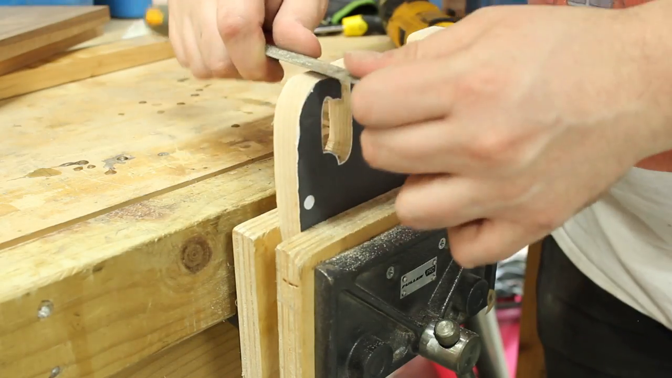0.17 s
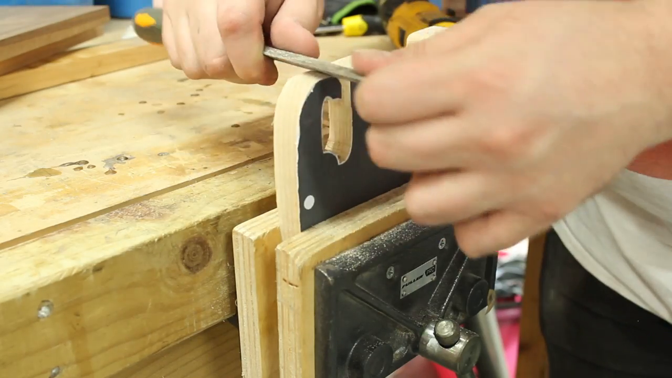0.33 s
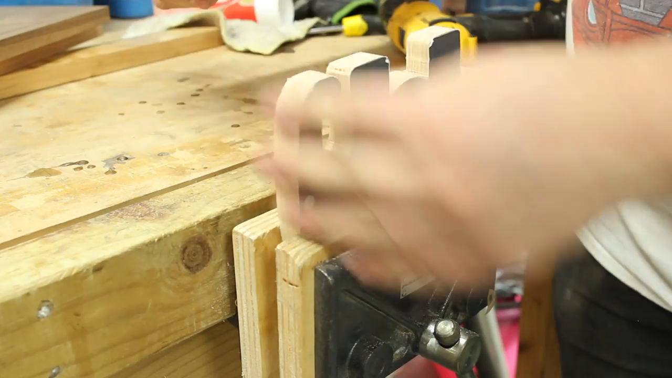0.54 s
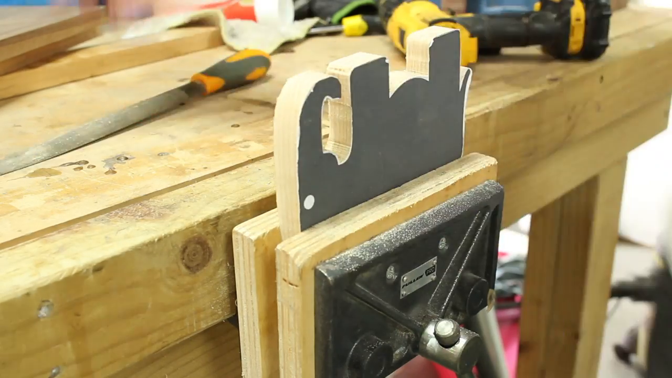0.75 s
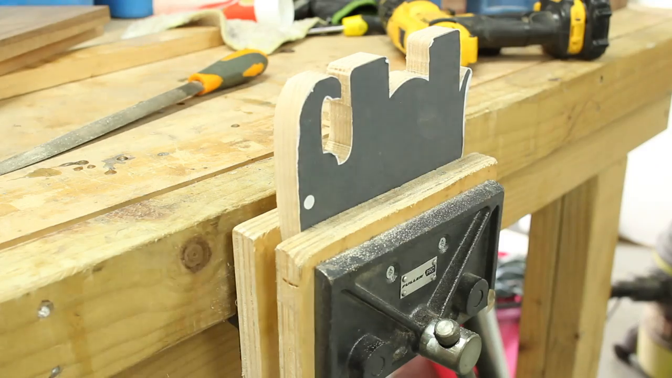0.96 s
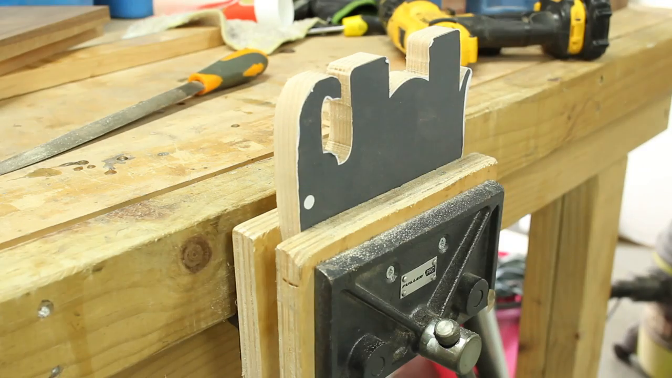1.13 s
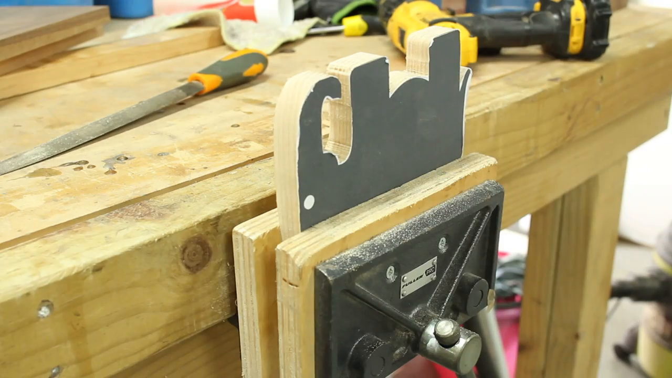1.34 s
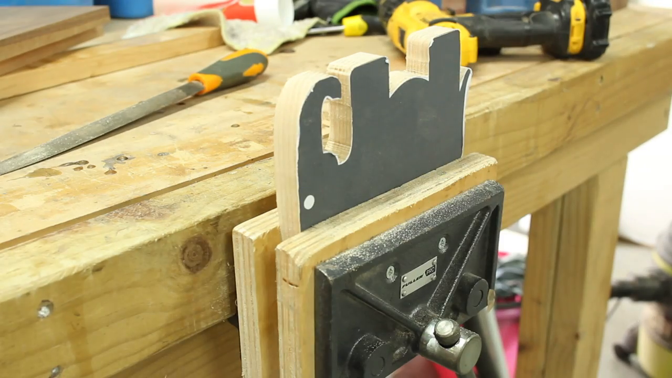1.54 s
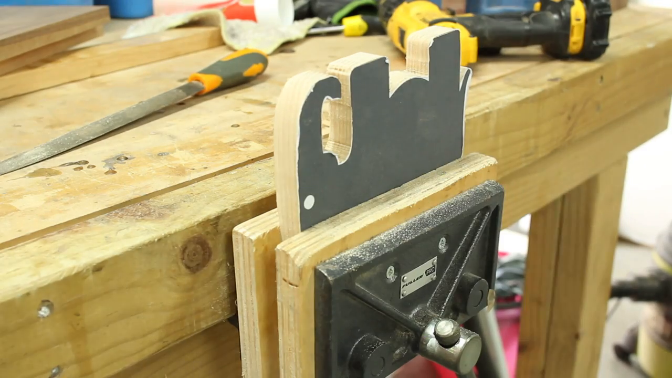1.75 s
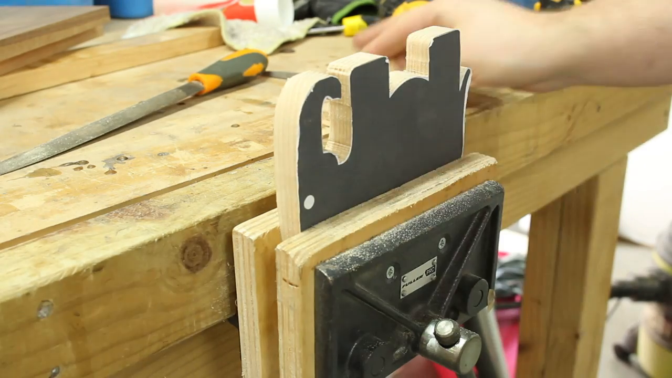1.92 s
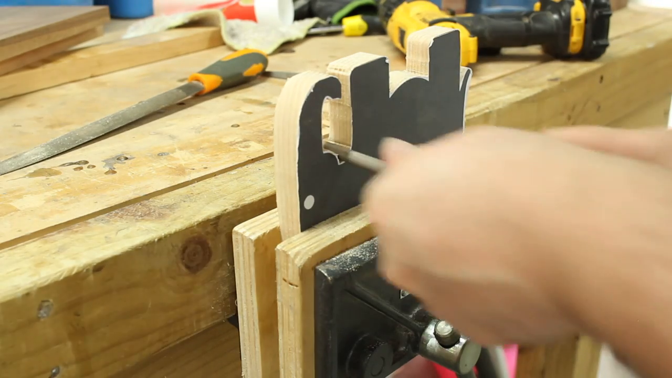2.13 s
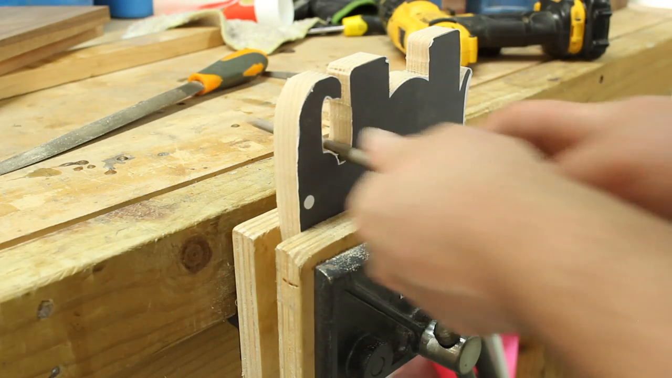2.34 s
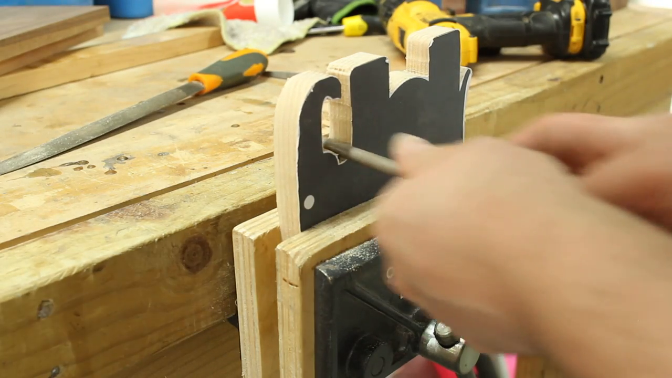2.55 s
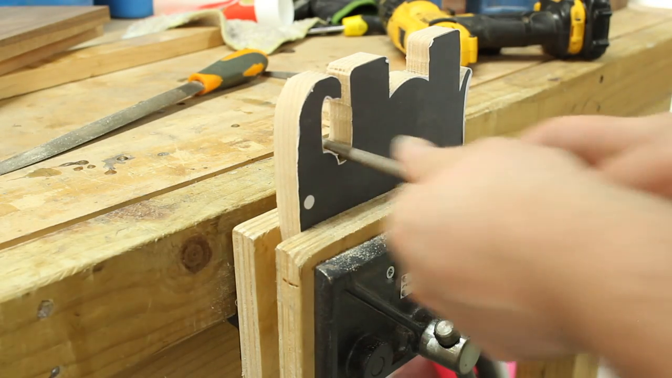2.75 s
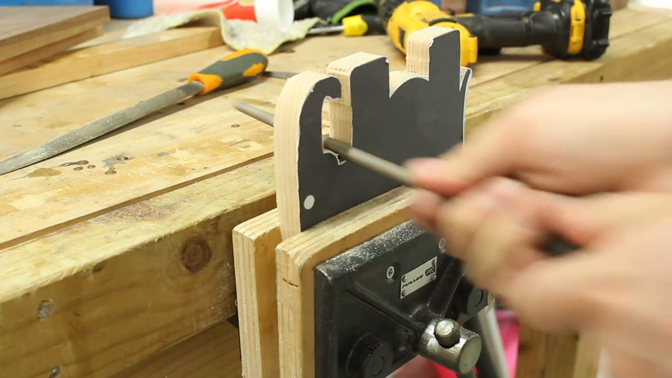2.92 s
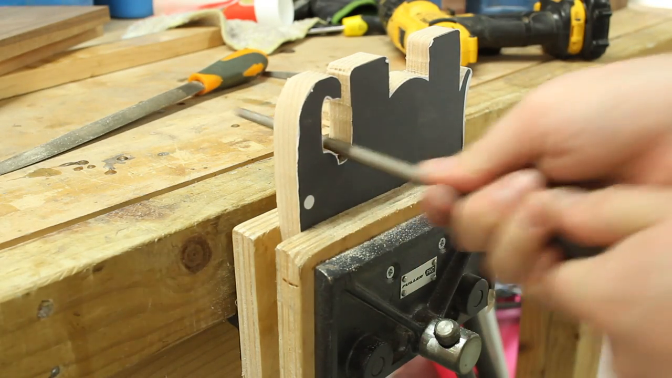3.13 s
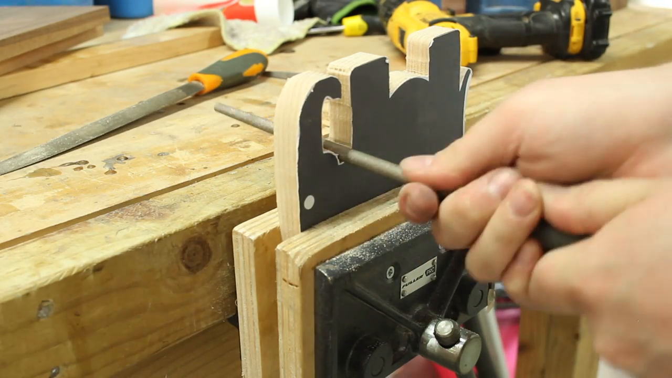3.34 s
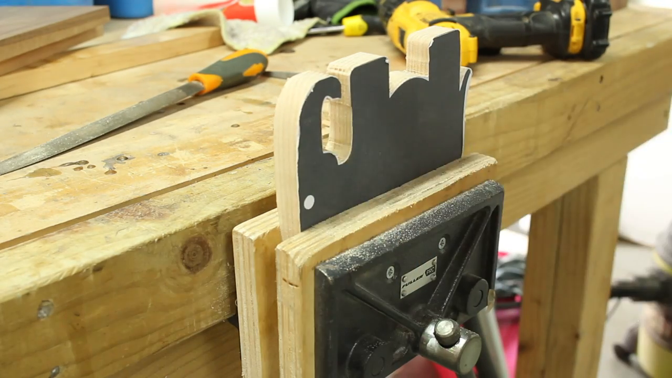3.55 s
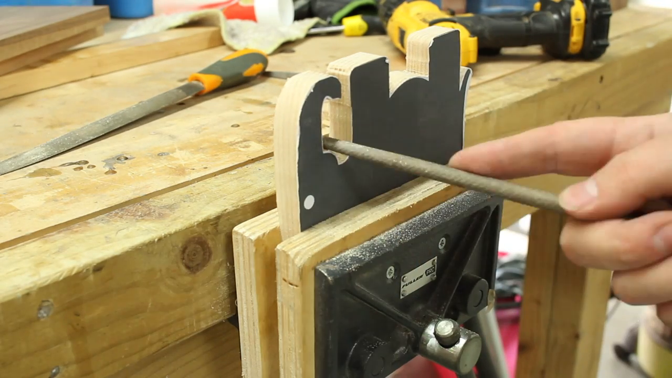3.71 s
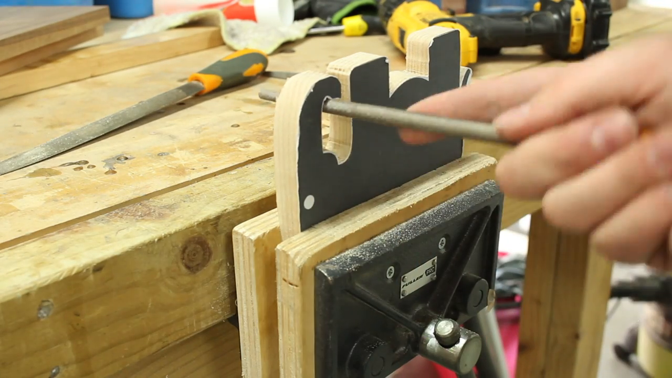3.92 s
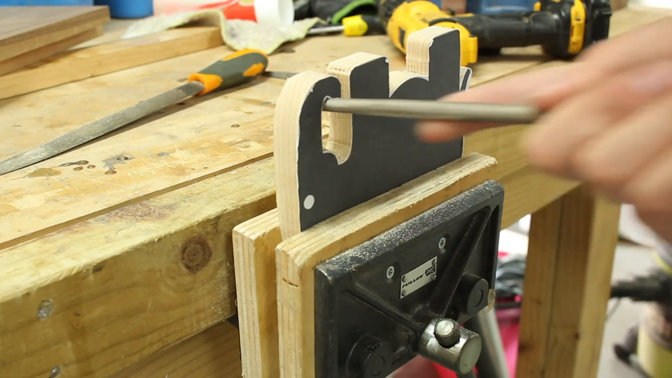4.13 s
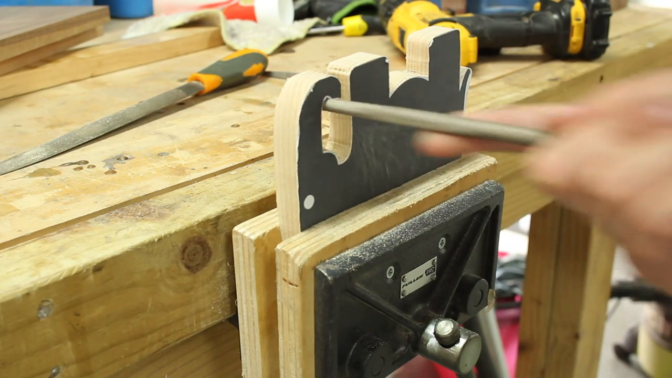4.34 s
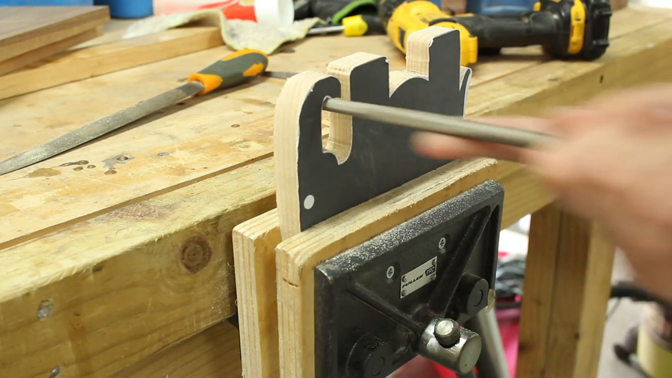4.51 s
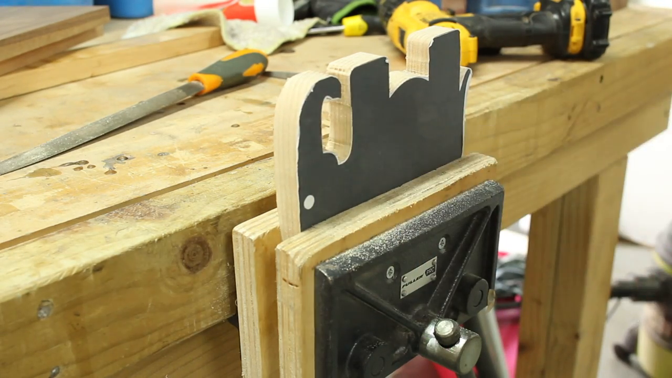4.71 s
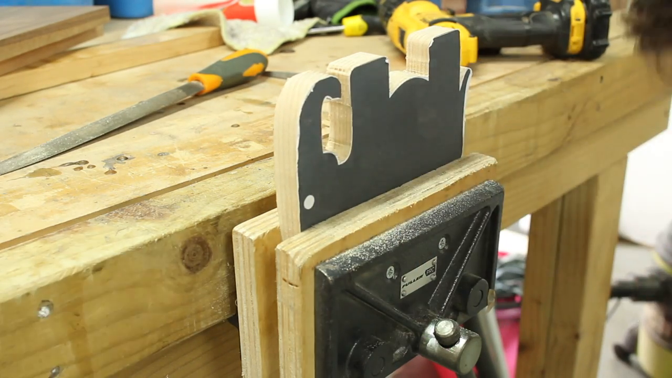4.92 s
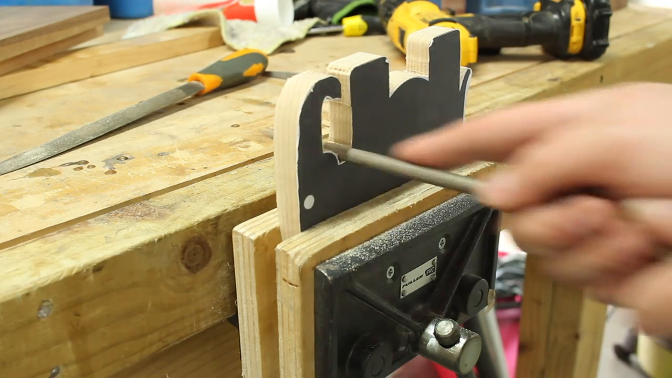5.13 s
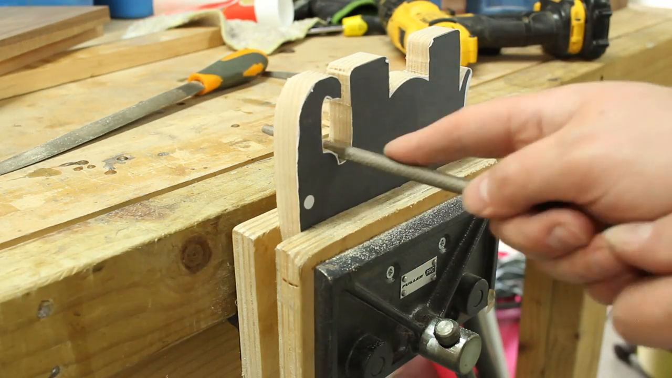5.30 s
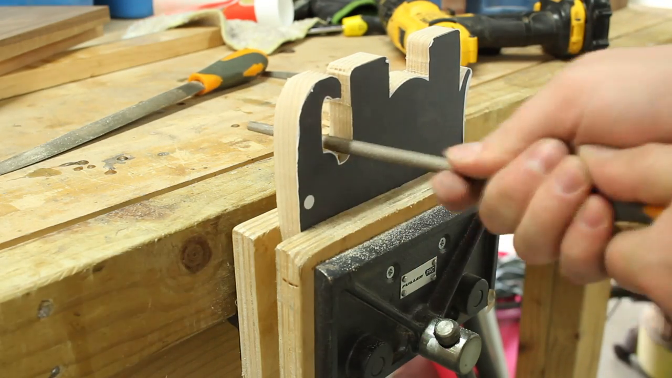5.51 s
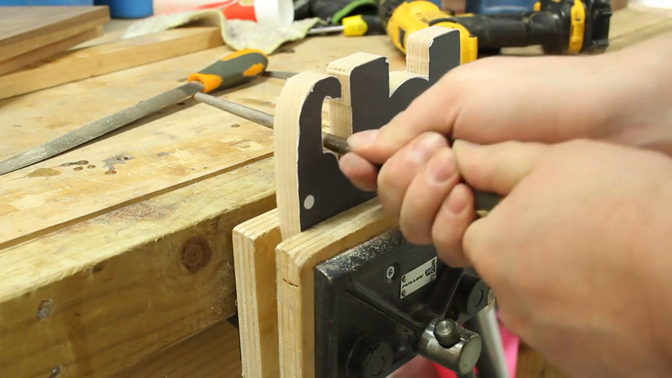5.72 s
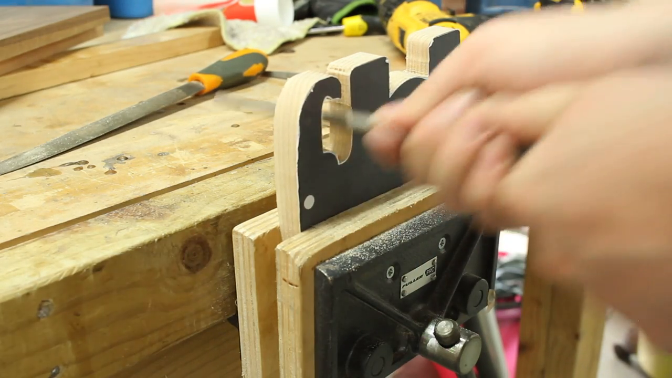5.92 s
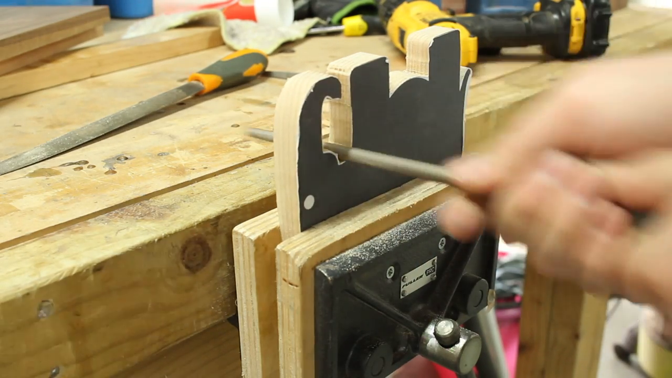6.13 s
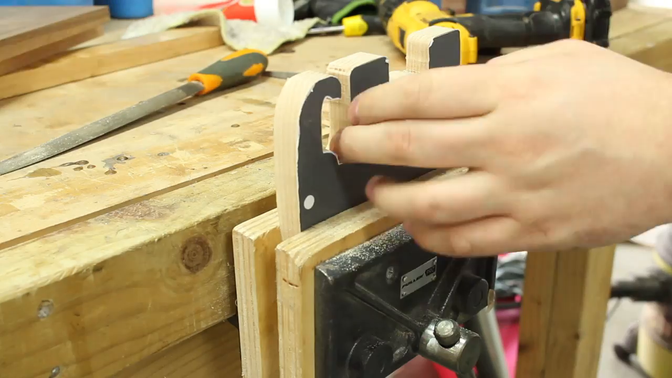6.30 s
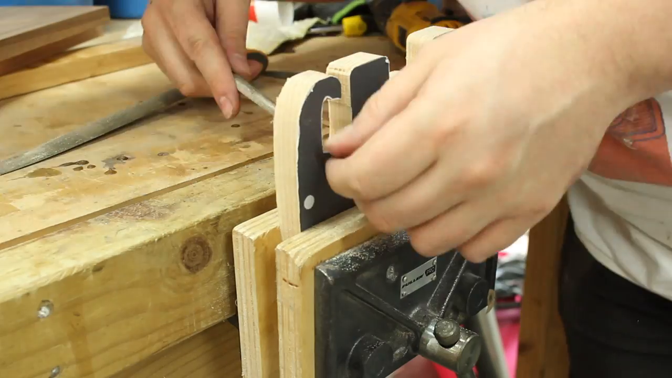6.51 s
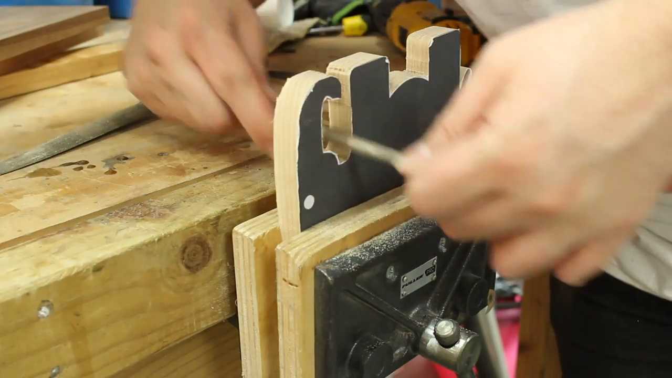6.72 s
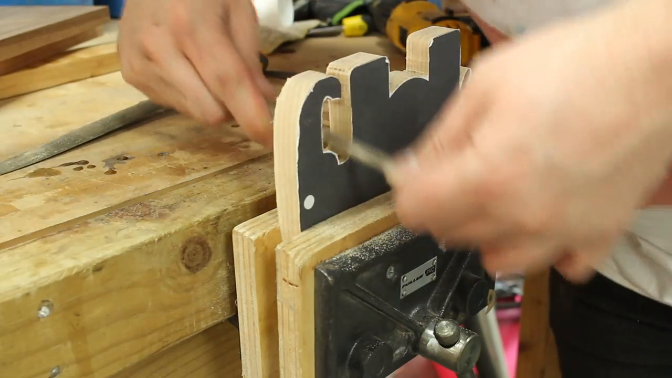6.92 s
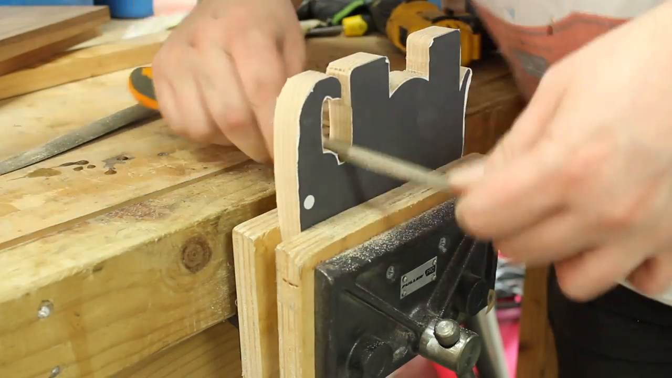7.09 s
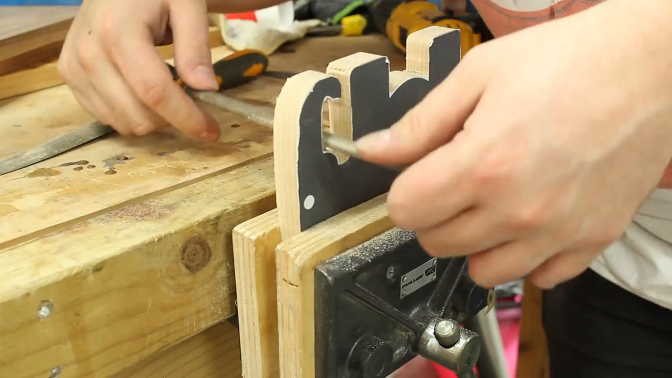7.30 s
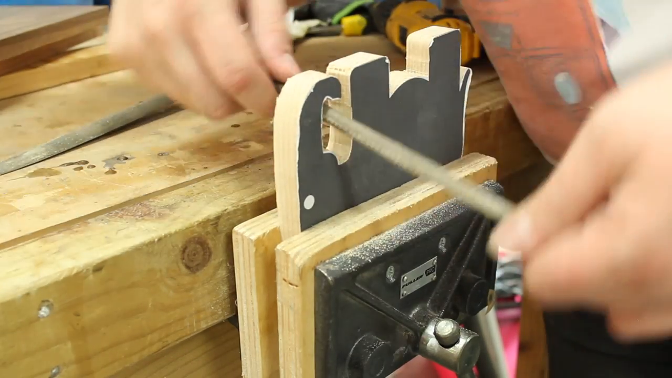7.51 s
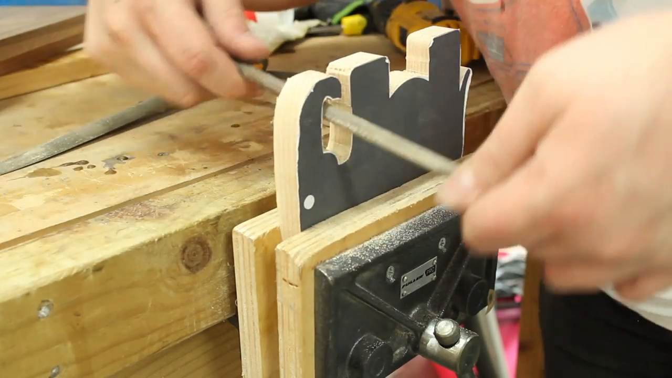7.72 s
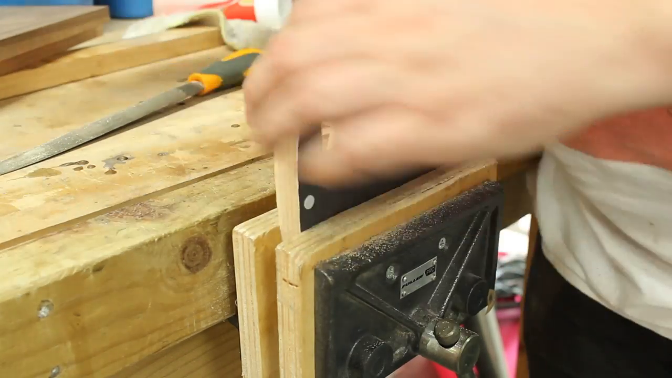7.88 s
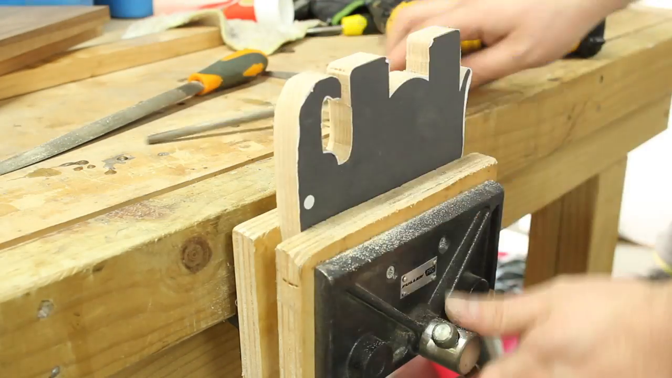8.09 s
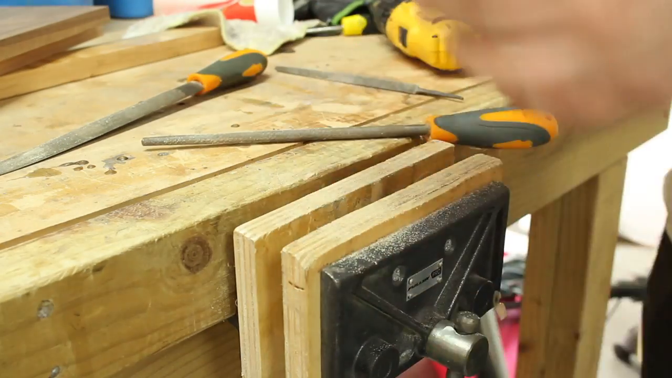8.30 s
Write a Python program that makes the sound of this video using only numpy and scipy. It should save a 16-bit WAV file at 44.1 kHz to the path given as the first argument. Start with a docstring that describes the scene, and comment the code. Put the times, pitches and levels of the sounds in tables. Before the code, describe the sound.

Close, fairly dry workshop sound of metal files scraping wood at fast-forward speed. A brief opening burst gives way to a pause filled with sharp tool clicks, a short rattle and soft cloth brushing. Then comes a long stretch of rapid back-and-forth rasping with high chirping squeaks, interrupted by a few short breaks. It finishes with clacks and a short wooden slide, over faint hiss and hum.

```python
"""A small workshop: hand files rasp a board in a vise, speeded up to bursts of some fifty strokes a second.
Each stroke scrapes board and steel into resonance; the teeth whistle at a rate set by hand speed. Between
bursts tools click on the bench, a file rattles to rest and sleeves rustle over a low hum. At the end the vise
knocks loose and the board slides out."""
import sys
import numpy as np
from scipy import signal
from scipy.fft import rfft, irfft, next_fast_len
from scipy.io import wavfile
from scipy.ndimage import map_coordinates

SR = 44100
rng = np.random.default_rng(int(sys.argv[2]) if len(sys.argv) > 2 else 0)


def to_wav(s):
    """Save 16-bit WAV."""
    ch = np.atleast_2d(s).T  # columns
    pcm = np.round(np.clip(ch, -1, 1) * 32767)  # PCM
    wavfile.write(sys.argv[1], SR, pcm.astype(np.int16))


N = 368235
ROW = 8192  # samples per event
HZ = np.fft.rfftfreq(ROW, 1 / SR)
TIME_S = np.arange(N) / SR

# Modes of board and file. Each row: centre in Hz, width in Hz, level in dB.
BODY_MODES = [(1381, 88, 4), (1170, 38, -6), (1702, 135, -2.5), (1967, 86, -4), (2745, 190, -2.5),
              (3194, 67, 2), (3660, 132, 1), (4590, 90, -1.5), (4871, 70, 1), (5750, 99, -6),
              (6140, 68, -4), (6540, 170, -6.5), (7530, 86, -1.5), (8160, 290, -5.5), (9050, 74, -3),
              (11130, 140, -4), (11920, 360, -6)]


def file_strokes(moves, rise=0.695, fall=1.402, grit_spread_db=3, teeth_db=-5, bite_db=18):
    """Tearing fibres and passing teeth follow the stroke speed and ring the workpiece."""
    start_s, db, rise_ms = moves.T[..., None]
    *grip_db, tooth_hz = grip_at(start_s[:, 0])[..., None]
    t = np.arange(ROW) / SR
    length_s = np.minimum(np.diff(start_s, axis=0, append=N / SR), .034)  # until the hand turns
    peak_s = np.clip(rise_ms / 1000, .001, length_s)
    swing = np.roll(length_s, 1) / 0.018  # a longer run-up lands harder
    speed = np.clip(t / peak_s, 0, 1) ** (rise / swing ** 1.515)
    speed *= np.clip(1 - (t - peak_s) / (1.126 * length_s - peak_s), 0, 1) ** fall
    clumps = amp(grit_spread_db * wobble(speed.shape, 40.5))
    grit = clumps * rng.standard_normal(speed.shape)
    pace = np.exp(0.23 * rng.standard_normal(db.shape))
    rate_hz = tooth_hz * pace * (.4 + .7 * speed + 0.1137 * wobble(speed.shape, 50.5))
    phase = 2 * np.pi * np.cumsum(rate_hz, axis=1) / SR
    teeth = amp(teeth_db + 2.7 * wobble(speed.shape, 120.5)) * np.sin(phase)
    force = swing ** 1.06 * amp(bite_db - 0.57 * rise_ms + 4 * rng.standard_normal(db.shape))
    bite = force * (t / 0.0005) * np.exp(-t / 0.00016)  # a quick start knocks the board
    scrape = rfft(speed * (grit + teeth)) + rfft(bite) * highpass(700, 2)
    sizzle = amp(0.45 * (db + 27.5)) * speed ** 1.3 * grit  # hard, fast strokes reach the treble
    treble = highpass(7000, 4)
    drive = scrape * (1 - treble) + rfft(sizzle) * treble
    contact = amp(3.25 * wobble(drive.shape, 70.5))  # each contact point favours other modes
    rows = irfft(drive * contact * workpiece(*grip_db, tooth_hz), ROW) * (t < ROW / SR / 2)
    return place(amp(db) * unit(rows) * np.sqrt(length_s * SR / ROW), start_s[:, 0] - .001)


def hand_moves(spread_db=1.68, log_rise_spread=.3):
    """To-and-fro runs merged with single strokes, in time order."""
    # Uneven strokes. Each row, also of the result: start in seconds, level in dB, rise time in ms.
    singles = [(0.144, -19, 5), (0.16, -21, 8.4), (0.187, -24, 11), (0.201, -21.5, 22), (0.223, -29.5, 7.2),
               (0.266, -22.5, 13), (0.281, -21.5, 12), (0.316, -25, 15.5), (0.35, -23.5, 24),
               (0.388, -24.5, 8.1), (0.409, -22, 8), (0.43, -21, 7.5), (0.449, -18.5, 1),
               (0.465, -21.5, 10.9), (0.49, -26, 5.6), (0.51, -20, 2.6), (0.538, -35.5, 0.86),
               (2.177, -23, 5.2), (2.204, -27, 5.9), (2.832, -25.5, 7.3), (2.876, -34.5, 23),
               (2.945, -29, 19), (3.781, -40.5, 5.2), (3.818, -20.5, 23), (3.853, -24.5, 12.5),
               (3.879, -24.5, 15), (3.903, -26, 4.8), (3.935, -27, 15.7), (3.982, -24.5, 9.6),
               (4.687, -23.5, 3.7), (5.165, -42, 41), (5.202, -24.5, 10.3), (5.229, -22.5, 6.6),
               (5.358, -32, 4.3), (5.425, -32.5, 13), (5.452, -34.5, 11), (6.613, -32, 9),
               (6.647, -20.5, 37), (6.688, -27, 21), (6.712, -23.5, 10), (6.739, -24, 6.4),
               (6.764, -19.5, 14), (6.793, -25, 15), (7.068, -20, 22), (7.103, -29, 4.6),
               (7.129, -20.5, 36), (7.172, -27, 4.5), (7.228, -23.5, 30), (7.265, -24, 12), (7.286, -22, 5),
               (7.318, -34.5, 3), (7.347, -32.5, 2.3), (7.381, -38, 9.4), (7.404, -18, 21.3),
               (7.445, -27.5, 6.1), (7.471, -25.5, 11), (7.512, -20, 10.4), (7.568, -20, 3),
               (7.6, -24.5, 3), (7.642, -22, 3.8), (7.676, -21.5, 10.5), (7.717, -39.5, 2.7),
               (7.747, -24, 5.1), (7.779, -18.5, 0.98), (7.805, -23.5, 19), (7.85, -20.5, 4.3),
               (7.88, -26, 5.1), (7.899, -20, 5.13)]
    # Steady runs. Each row: first and last push in seconds, pull start as share of the cycle,
    # push, pull and swell in dB, push and pull rise time in ms.
    runs = [(0.003, 0.079, 0.44, -21.5, -23, -0.5, 10.4, 6.3),
            (2.223, 2.373, 0.62, -21, -25.5, 0, 3.3, 3.5), (2.408, 2.584, .52, -22, -25, 0.5, 5.6, 7),
            (2.622, 2.791, 0.53, -24, -25.5, -1.5, 6.1, 8), (2.971, 3.058, 0.54, -24, -24.5, -2, 12, 6),
            (3.096, 3.242, 0.52, -23.5, -23.5, 0.5, 7.1, 6.5),
            (3.282, 3.481, 0.63, -22, -23.5, 0.5, 7.6, 8.8),
            (4.012, 4.185, 0.45, -20.5, -23.5, 1, 5.2, 8.6), (4.227, 4.391, 0.53, -24, -19.5, -4, 5.8, 8.7),
            (4.43, 4.558, 0.66, -29, -29, 1, 2.2, 11), (4.6, 4.645, 0.41, -21.5, -20, 0.5, 9.4, 13.7),
            (5.252, 5.324, .52, -24.5, -26, -6, 6.4, 6.5), (5.473, 5.594, 0.53, -21, -23.5, 2.5, 6.3, 7.7),
            (5.633, 5.743, 0.51, -20, -23, 3.5, 6, 6.5), (5.782, 5.936, 0.52, -21.5, -24, 0.5, 7, 9.6),
            (5.977, 6.217, .5, -21, -23.5, -0.5, 7.3, 9.3), (6.818, 7.02, 0.56, -21, -24.5, 1, 7, 7.8)]
    # Pushes per run.
    counts = [3, 5, 6, 6, 3, 5, 6, 5, 5, 4, 2, 3, 4, 4, 5, 7, 6]
    rows = []
    for (first_s, last_s, share, push_db, pull_db, swell_db, push_ms, pull_ms), count in zip(runs, counts):
        cycle_s = (last_s - first_s) / (count - 1)
        for k in range(count):
            lift_db = swell_db * (k / (count - 1) - .5)
            rows.append((first_s + k * cycle_s, push_db + lift_db, push_ms))
            rows.append((first_s + (k + share) * cycle_s, pull_db + lift_db, pull_ms))
    rows = np.array(rows)
    scatter = rng.standard_normal((len(rows), 2))
    rows[:, 2] *= np.exp(log_rise_spread * scatter[:, 0])
    rows[:, 1] += spread_db * scatter[:, 1]
    rows = np.vstack([rows, singles])
    return rows[np.argsort(rows[:, 0])]


def grip_at(time_s):
    """Settings of the hold in force at each time."""
    # Each row: start in seconds; steel hiss, board boom, bench thrum, upper-mode ring
    # and rasp in relative dB; nominal tooth rate in Hz.
    holds = [(0, -2, -12.5, -30.5, -1, 4.5, 3512), (2.1, -4.5, -11.5, -21, -1.5, 4.5, 6500),
             (2.94, -4, -11.5, -23, 0, -7, 4172), (3.7, -0.5, -11.5, -33.5, -4.5, 2, 6540),
             (4.38, 7.5, -10.5, -27, 0.5, 4, 7060), (4.6, 2, -6.5, -26, 4.5, 0.5, 7490),
             (5.1, -10.5, -13.5, -30, 3, -6.5, 4940), (5.42, -1.5, -12, -25, -2.5, -2, 3097),
             (6.5, -5, -7, -29.5, -1.5, -13, 3209), (7.22, -7, -4.5, -35, -2, -10.5, 2635),
             (7.4, 0.5, -8, -32.5, 0.5, 0.5, 3645)]
    holds = np.array(holds)
    return holds[np.searchsorted(holds[:, 0], time_s) - 1, 1:].T


def workpiece(hiss_db, boom_db, thrum_db, ring_db, rasp_db, tooth_hz):
    """Response of file, board and bench, weighted by the hold."""
    # Floor between the modes. Each row: frequency in Hz, level in dB.
    floor = [(25, -28), (130, -57.5), (900, -77), (1150, -6.5), (2200, -13), (4000, -13.5), (7000, -13.5),
             (10000, -16.5), (12000, -21), (14000, -15.5), (16000, -33)]
    # Low modes. Each row: centre in Hz, then width in Hz and level in dB before the exponents below.
    board_modes = [(548.6, 30, -2.5), (626, 113, 1)]
    bench_modes = [(190, 30, 0.5), (242, 21, -9), (304.3, 23, 2)]
    damping = amp(ring_db * highpass(4200, 12)) ** 2  # fingers on the steel
    rasp = power([(tooth_hz, 900, rasp_db - 6)], HZ) ** 2
    radiation = highpass(1100, 8)  # a small board radiates little bass
    steel = radiation * (damping * power(BODY_MODES, HZ) + rasp) + contour(floor, HZ) ** 2
    steel *= amp(hiss_db * np.clip(np.log2(HZ / 6000 + 1e-9), 0, 1)) ** 2
    boom = amp(boom_db) ** 2 * power(board_modes, HZ) ** 2.04
    thrum = amp(thrum_db) ** 2 * power(bench_modes, HZ) ** 1.42
    return minimum_phase(np.sqrt(steel + boom + thrum))


def squeaks(moves, rise_s=0.0017, fall_s=0.0033, glide_hz=500, waver_hz=170, lead_s=.012):
    """Teeth catch in step and whistle, gliding up as the file gathers speed."""
    # Loud catches. Each row: centre in seconds, tooth rate in Hz, relative level in dB.
    loud = [(0.329, 3640, -27), (0.546, 3900, -20.5), (2.288, 6430, -20), (2.418, 3740, -18.5),
            (2.453, 3600, -16.5), (2.594, 7400, -20), (2.702, 6760, -18.5), (2.977, 4970, -19),
            (3.265, 2800, -14.5), (3.448, 4390, -18), (3.866, 4820, -19), (4.149, 7080, -21),
            (4.398, 6830, -11.5), (4.439, 6860, -10), (4.452, 11800, -24), (4.481, 6780, -12),
            (4.531, 11800, -21), (4.52, 7300, -12.5), (4.563, 6980, -11.5), (5.233, 4720, -19.5),
            (5.277, 4970, -17.5), (5.619, 2794, -15.5), (5.654, 2770, -13.5), (5.77, 2700, -15),
            (5.845, 2760, -16.5), (5.889, 3000, -20), (5.945, 3610, -15.5), (5.964, 2710, -15.5),
            (6.004, 2560, -11), (6.044, 3150, -13), (6.062, 3680, -19), (6.183, 4370, -15),
            (6.207, 3700, -16.5), (6.254, 5000, -19.5), (6.707, 1760, -22), (6.847, 3650, -15),
            (6.972, 3760, -22), (7.03, 3760, -21), (7.051, 3550, -23), (7.183, 3640, -19.5),
            (7.606, 4300, -12), (7.718, 1910, -21.5), (7.888, 2700, -27), (7.896, 3300, -21.5),
            (7.906, 3640, -20.5)]
    start_s, stroke_db, rise_ms = moves.T
    scatter = rng.standard_normal((len(moves), 2))
    faint_hz = grip_at(start_s)[-1] * np.exp(.12 * scatter[:, 0])
    faint_db = stroke_db - 13.5 + 5 * scatter[:, 1]
    faint = np.c_[start_s + rise_ms / 1000, faint_hz, faint_db]  # one per stroke
    centre_s, hz, db = np.vstack([loud, faint]).T[..., None]
    t = np.arange(ROW // 8) / SR - lead_s
    envelope = np.exp(-(t / np.where(t < 0, rise_s, fall_s)) ** 2 / 2)
    glide = np.tanh(t / np.where(t < 0, 0.0015, 0.006))
    rate_hz = hz + glide_hz * glide + waver_hz * wobble((len(hz), len(t)), 40.5)
    phase = 2 * np.pi * np.cumsum(rate_hz, axis=1) / SR
    flutter = amp(3 * wobble(phase.shape, 50))
    whistle = np.sin(phase) + amp(-19.5) * np.sin(2 * phase)
    return place(amp(db + 3.5) * flutter * envelope * whistle, centre_s[:, 0] - lead_s)


def knocks(crack_t60_s=.003, tail_t60_s=0.064):
    """Tools hit the bench, and at the end the vise knocks as it loosens: a crack and a noise tail, with steel
    treble and a wooden knock."""
    # Each row: start in seconds; peak, treble and knock in relative dB.
    hits = [(0.5887, -32.5, -25, 0), (0.609, -17, -9, -9), (0.7655, 1, -10.5, -28), (0.7764, -17, -20, -34),
            (0.785, -6, -12, -15.5), (0.9513, -28.5, -16, -15), (1.0724, -21.5, -1, -16),
            (1.1135, -22, -23, -30), (1.1901, -13, 5, -31), (1.236, -5, 6, -36), (1.263, -18, -14.5, -17.5),
            (1.274, -3, 21, -46), (1.3029, -32, -17, -8), (1.393, -17, -26, -37), (1.407, -5.5, -10.5, -45),
            (1.43, -0.5, -6.5, -41), (1.4506, -17.5, -23.5, -26), (1.4641, -9.5, -29, -25),
            (1.492, -10.5, -19, -11), (1.725, -21.5, -39, -34), (1.7685, -21.5, -13.5, -29),
            (1.8056, -18.5, -7, -37), (1.907, -25, -7, -19), (1.9145, -17.5, -7, -38),
            (1.984, -8.5, -3.5, -36), (1.994, -1, -1.5, -42), (2.0776, -22, -11, -33),
            (2.14, -19.5, -33, -1.5), (3.592, -22.5, 0, -26), (4.739, -36, -2.5, -26),
            (6.4563, -25.5, -3, -8), (6.911, -1.5, 4, -26), (7.3815, -20, -2.5, -33),
            (7.9642, -18, -8, -32), (8.0207, -21, -21, -25), (8.0685, -23.5, -9.5, -18),
            (8.1553, -4.5, -5.5, -7), (8.1739, 3, -2, -24), (8.21, -10, -31, 0.5), (8.2383, -5, -21, -16.5),
            (8.2466, -1, -29, -12.5), (8.2954, -22.5, -43.5, 21), (8.3052, -13.5, -24, -3)]
    start_s, db, treble_db, knock_db = np.transpose(hits)[..., None]
    t = np.arange(ROW) / SR
    envelope = amp(-60 * t / crack_t60_s) + amp(-16.5 - 0.33 * db - 60 * t / tail_t60_s)
    blow = envelope * rng.standard_normal(envelope.shape)
    middle = power([(3450, 3900, -0.84)], HZ) ** 2 + 0.089 * power(BODY_MODES, HZ)
    treble = amp(treble_db) ** 2 * power([(8900, 9300, 0.0058)], HZ) ** 2
    knock = amp(knock_db + 15) ** 2 * power([(1400, 190, 1.5), (587, 62, -4.5)], HZ) ** 1.4
    rows = irfft(rfft(blow) * minimum_phase(np.sqrt(middle + treble + knock)), ROW)
    return place(amp(db - 3.5) * rows / np.abs(rows).max(axis=1, keepdims=True), start_s[:, 0])


def file_rattle(taps_per_s=110):
    """A file rocks to rest; uneven taps ring three modes."""
    # Envelope. Each row: time in seconds, level in dB.
    decay = [(0.789, -36), (0.804, -44.5), (0.99, -61.5)]
    # Each row: centre in Hz, width in Hz, level in dB.
    modes = [(1136, 180, 2.5), (2500, 520, 0.5), (3630, 800, -3)]
    time_s, db = np.transpose(decay)
    taps_s = np.arange(time_s[0], time_s[-1], 1 / taps_per_s)
    taps_s += rng.uniform(0.0026, 0.0062, len(taps_s))
    ring = irfft(minimum_phase(power(modes, HZ)), ROW)
    gain = amp(np.interp(taps_s, time_s, db) + 3.2 * rng.standard_normal(len(taps_s)) + 0.5)
    return place(gain[:, None] * ring / np.linalg.norm(ring) * np.sqrt(SR / taps_per_s), taps_s)


def board_release():
    """A palm hisses over the board, then the wood slides along the vise jaws."""
    # Each row: time in seconds, palm rub in dB, wood slide in dB.
    levels = [(7.9, -40, -59), (8.0, -52, -49.5), (8.13, -48, -66), (8.17, -45, -46), (8.22, -59.5, -40),
              (8.3, -63, -31), (8.35, -49, -44)]
    time_s, rub_db, slide_db = np.transpose(levels)
    rub = amp(np.interp(TIME_S, time_s, rub_db, left=-120))
    rub *= noise(power, [(7370, 2800, 0)])
    slide = amp(np.interp(TIME_S, time_s, slide_db, left=-120) + 6.5 * wobble((1, N), 300.5)[0])
    slide *= noise(power, [(615, 150, -4.0), (1240, 250, 1.0), (2560, 1700, -4.5)])
    return rub + slide


def room_tail(x, t60_s=0.079):
    """Short reverberation from the walls."""
    t = np.arange(SR // 4) / SR
    tail = amp(-60 * t / t60_s) * rng.standard_normal(len(t))
    return signal.fftconvolve(np.pad(x, (60, 0)), tail / np.linalg.norm(tail))[:N]


def sleeves():
    """Brushing cloth: swells of flickering noise."""
    # Each row: centre in seconds, half length in seconds, level in dB.
    brushes = [(0.602, 0.016, -66), (0.957, 0.45, -54), (1.309, 0.022, -45.5), (1.485, 0.13, -54.5),
               (1.759, 0.074, -57), (2.064, 0.35, -55.5), (3.622, .03, -55), (5.131, 0.05, -64),
               (6.418, 0.066, -52), (8.2, 0.18, -42.5)]
    # Each row: frequency in Hz, level in dB.
    spectrum = [(300, -16.5), (1000, -2.5), (3000, 0), (8000, -3.5), (16000, -11)]
    envelope = sum(amp(db) * bell(centre_s, half_s) for centre_s, half_s, db in brushes)
    return envelope * amp(6.0 * wobble((1, N), 500.5)[0]) * noise(contour, spectrum)


def faint_tone(fade_s=0.013):
    """One brief, steady sine."""
    # Start and end in seconds, pitch in Hz, level in dB.
    tone = (4.9, 5.035, 876, -58)
    start_s, end_s, hz, db = tone
    gate = np.clip(np.minimum(TIME_S - start_s, end_s - TIME_S) / fade_s, 0, 1)
    return amp(db) * gate * np.sin(2 * np.pi * hz * TIME_S)


def room_tone(air_db=-57.5, hum_db=-70.5):
    """Steady air noise and a wavering narrow-band hum that swells once."""
    # Each row: frequency in Hz, density in dB.
    air_spectrum = [(20, -13.5), (60, -29), (130, -21.5), (300, -5), (460, -3.5), (700, -6), (900, -2),
                    (14800, -13), (16500, -55)]
    # Each row: centre in Hz, width in Hz, level in dB.
    hum_bands = [(413, 27, -3), (475, 18, 1), (692, 31, -0.5)]
    # Centre in seconds, half length in seconds, lift in dB.
    swell = (0.98, 0.78, 4.8)
    centre_s, half_s, lift_db = swell
    air = amp(air_db) * noise(contour, air_spectrum)
    hum = amp(hum_db + lift_db * bell(centre_s, half_s)) * noise(power, hum_bands)
    return air + hum


def amp(db):
    """dB to gain."""
    return 10 ** (np.asarray(db) / 20)


def unit(x):
    """Rms 1 along the last axis."""
    return x / np.sqrt(np.mean(np.abs(x) ** 2, axis=-1, keepdims=True) + 1e-20)


def bell(centre_s, half_s):
    """Gaussian envelope on the timeline."""
    return np.exp(-((TIME_S - centre_s) / half_s) ** 2)


def highpass(corner_hz, order):
    """Smooth step from 0 to 1 on the HZ grid."""
    return 1 / (1 + (corner_hz / (HZ + 1)) ** order)


def contour(points, hz):
    """Gain through (Hz, dB) points on a log frequency axis."""
    knots_hz, db = np.transpose(points)
    return amp(np.interp(np.log(hz + 1), np.log(knots_hz + 1), db))


def power(modes, hz):
    """Power response of (centre Hz, width Hz, dB) resonances."""
    return sum(amp(db) ** 2 * (hz * width) ** 2 / ((centre ** 2 - hz ** 2) ** 2 + (hz * width) ** 2)
               for centre, width, db in modes)


def minimum_phase(gain):
    """Causal response for each row of gains on the HZ grid."""
    cepstrum = irfft(np.log(gain + 1e-6), ROW)
    cepstrum[..., 1:ROW // 2] *= 2
    cepstrum[..., ROW // 2 + 1:] = 0
    return np.exp(rfft(cepstrum))


def noise(curve, table):
    """Noise of rms 1 with curve(table, hz) as its gain."""
    size = next_fast_len(N)
    gain = curve(table, np.fft.rfftfreq(size, 1 / SR))
    return unit(irfft(rfft(rng.standard_normal(size)) * gain, size)[:N])


def wobble(shape, step):
    """Random rows, linear between knots `step` samples apart."""
    knots = rng.standard_normal((shape[0], int(shape[1] / step) + 4))
    grid = np.meshgrid(np.arange(shape[0]), np.arange(shape[1]) / step, indexing="ij")
    return map_coordinates(knots, grid, order=1)


def place(rows, starts_s):
    """Sum one row per event into the timeline."""
    out = np.zeros(N + ROW)
    for row, start_s in zip(rows, starts_s):
        out[max(round(start_s * SR), 0):][:len(row)] += row
    return out[:N]


def scene():
    """Bench sounds and their reverberation over the background, mono."""
    moves = hand_moves()
    near = file_strokes(moves) + squeaks(moves) + knocks() + file_rattle() + board_release()
    return (near + amp(-10.5) * room_tail(near) + sleeves() + faint_tone() + room_tone())[None]


def record(dry, knee=.8, top_hz=16300):
    """Soft clip, then band limit."""
    size = next_fast_len(N)
    soft = dry / (1 + np.abs(dry / knee) ** 4) ** .25
    passband = np.fft.rfftfreq(size, 1 / SR) < top_hz
    return irfft(rfft(soft, size) * passband, size)[:, :N]


dry = scene()
out = record(dry)
to_wav(out)
```